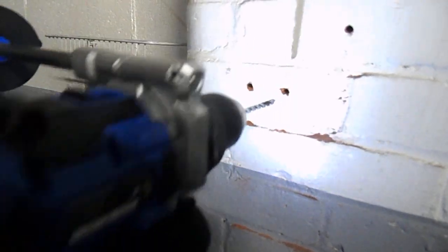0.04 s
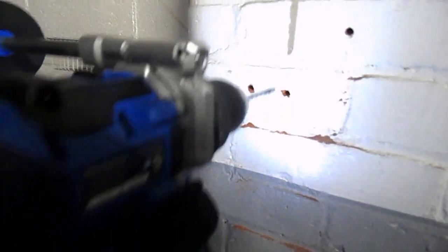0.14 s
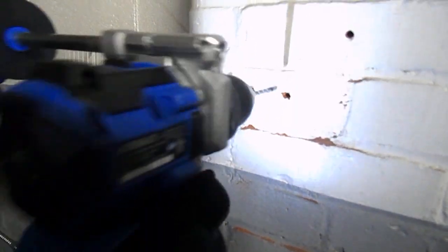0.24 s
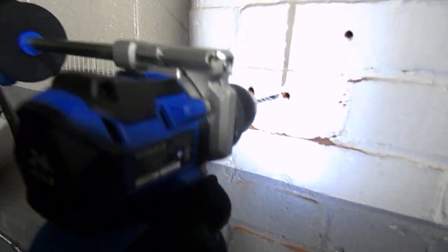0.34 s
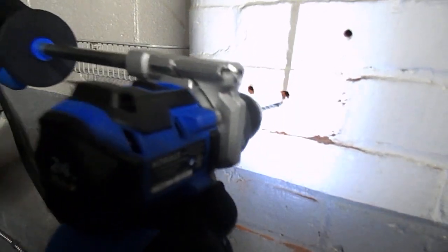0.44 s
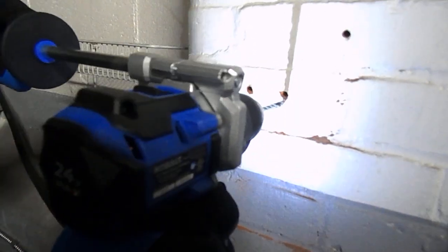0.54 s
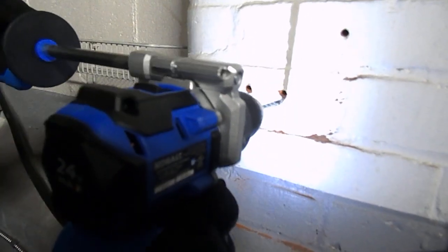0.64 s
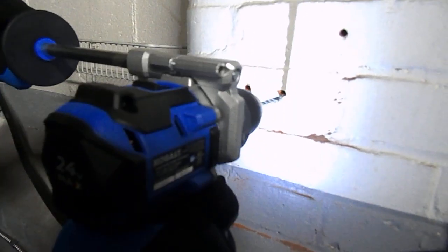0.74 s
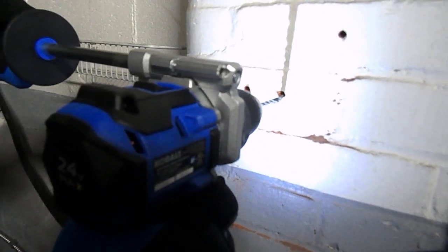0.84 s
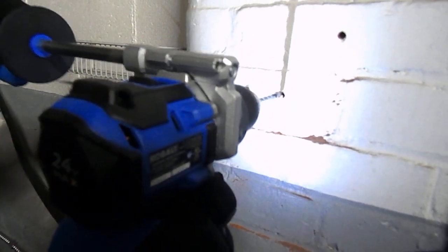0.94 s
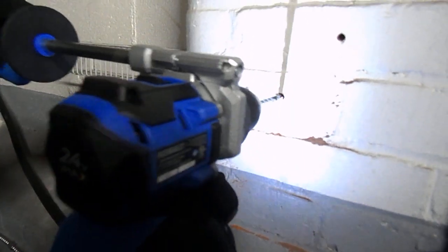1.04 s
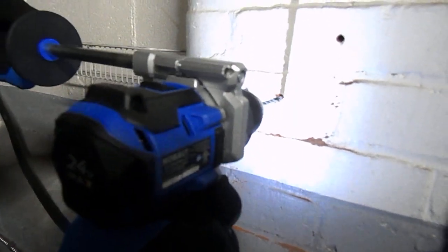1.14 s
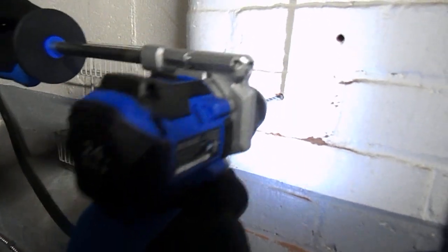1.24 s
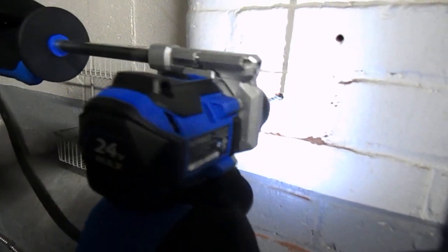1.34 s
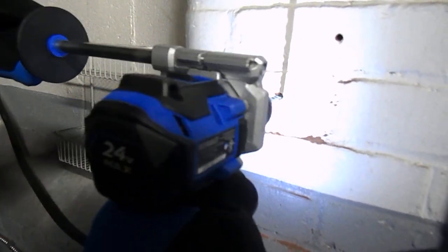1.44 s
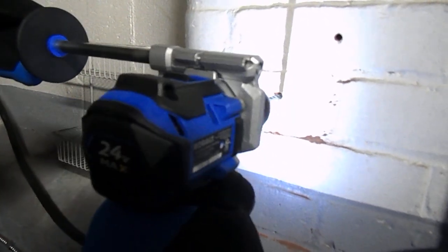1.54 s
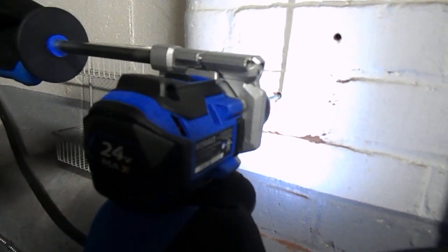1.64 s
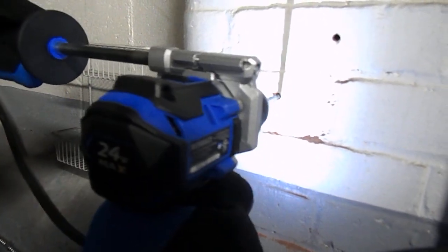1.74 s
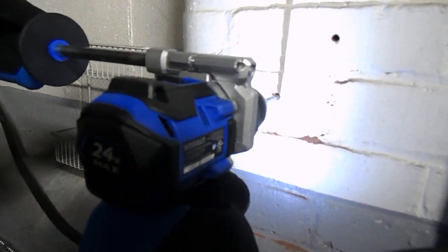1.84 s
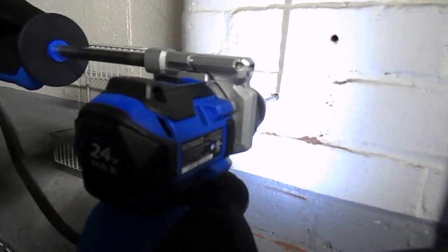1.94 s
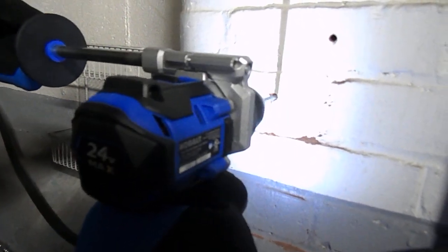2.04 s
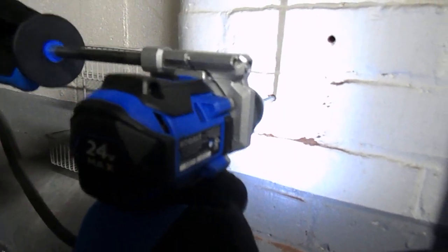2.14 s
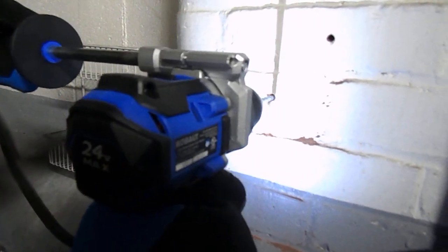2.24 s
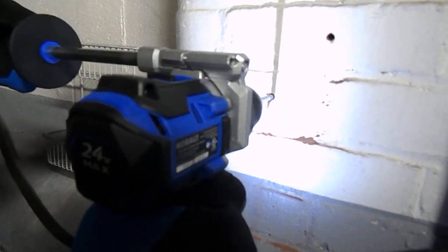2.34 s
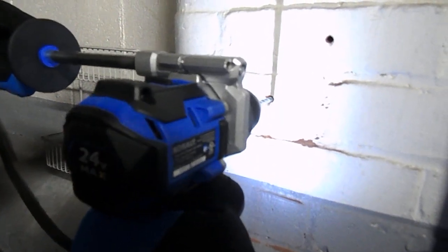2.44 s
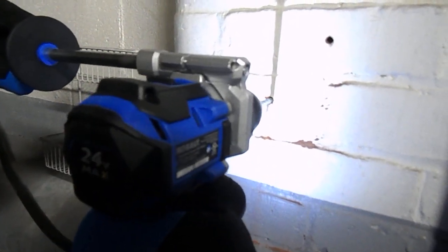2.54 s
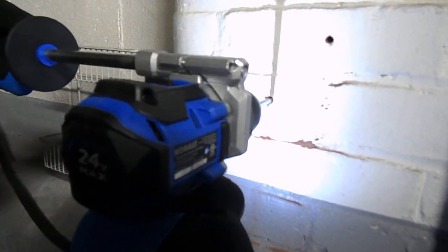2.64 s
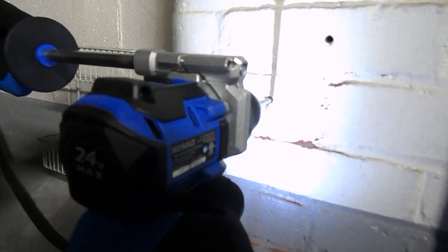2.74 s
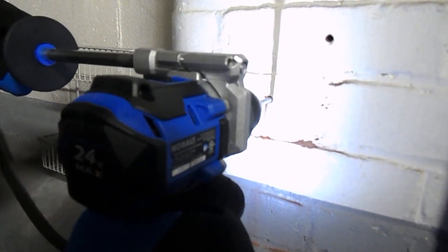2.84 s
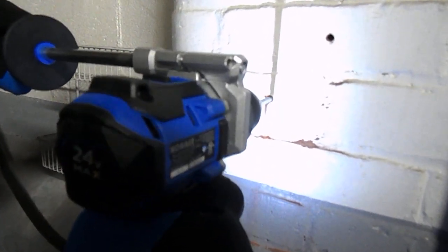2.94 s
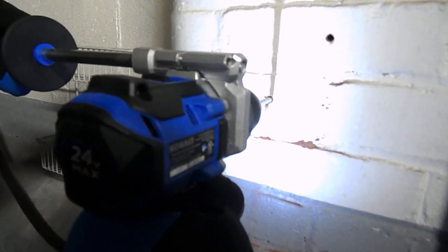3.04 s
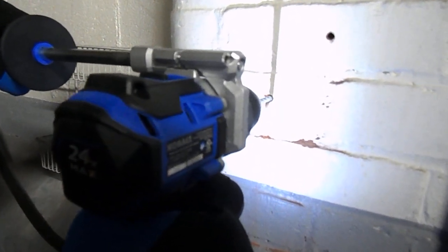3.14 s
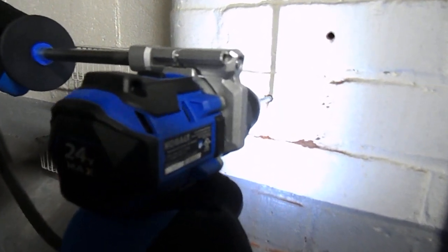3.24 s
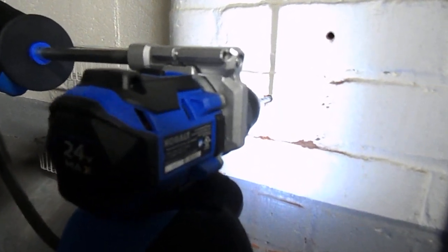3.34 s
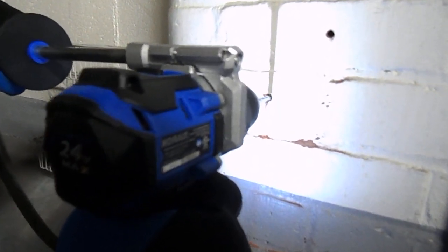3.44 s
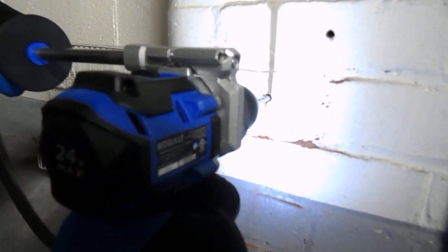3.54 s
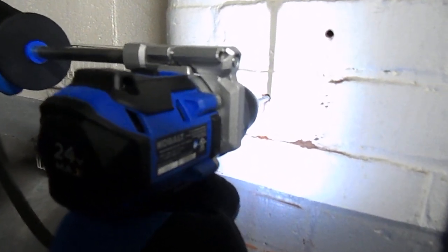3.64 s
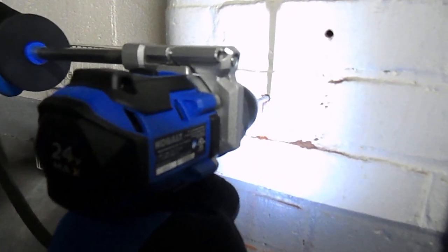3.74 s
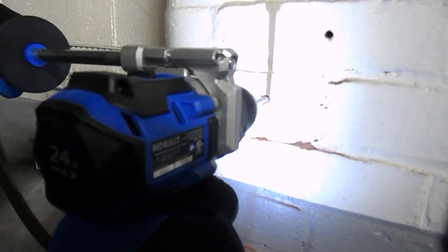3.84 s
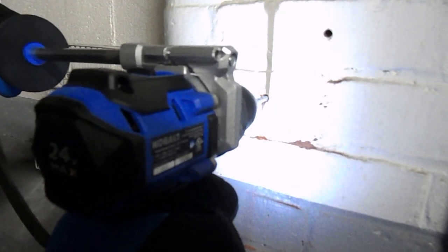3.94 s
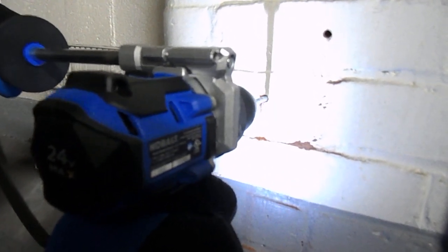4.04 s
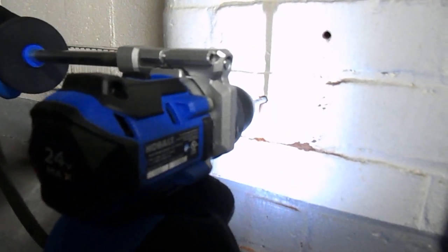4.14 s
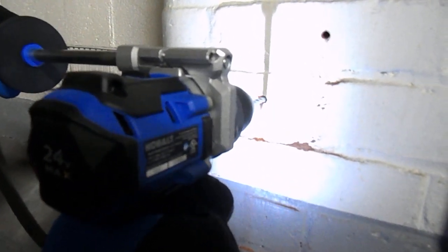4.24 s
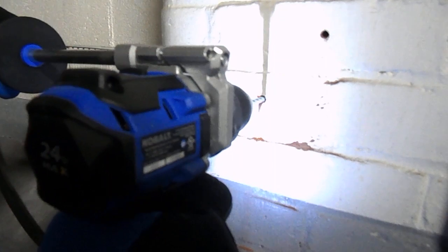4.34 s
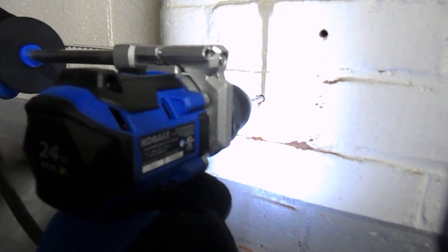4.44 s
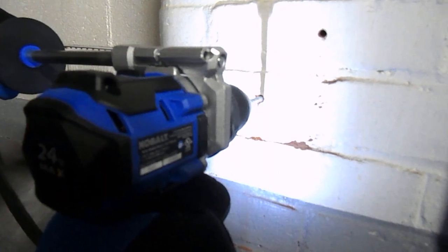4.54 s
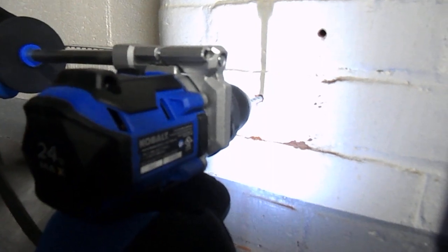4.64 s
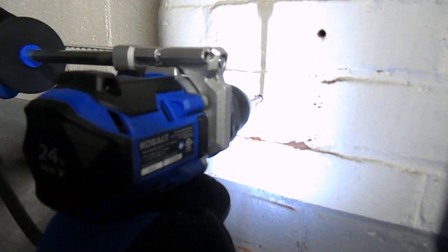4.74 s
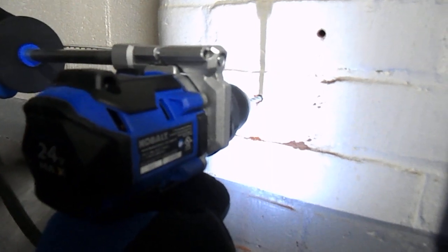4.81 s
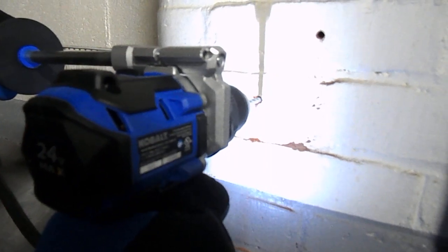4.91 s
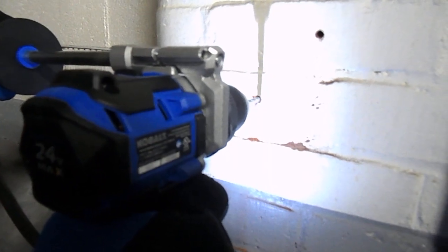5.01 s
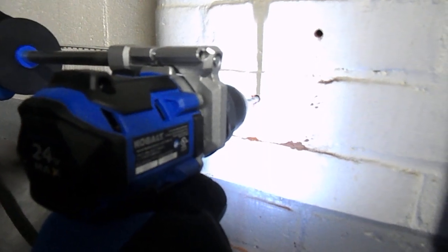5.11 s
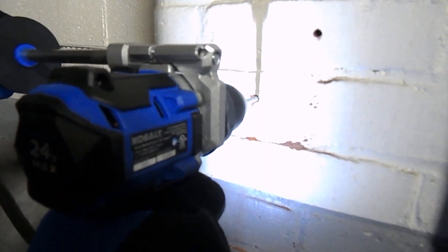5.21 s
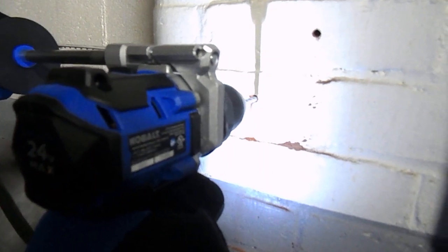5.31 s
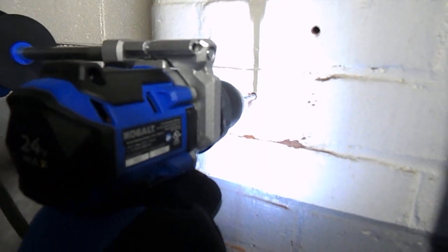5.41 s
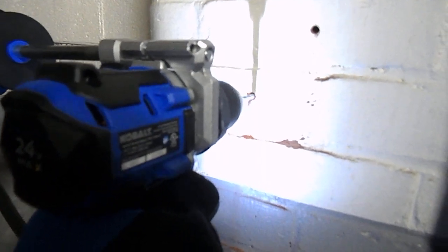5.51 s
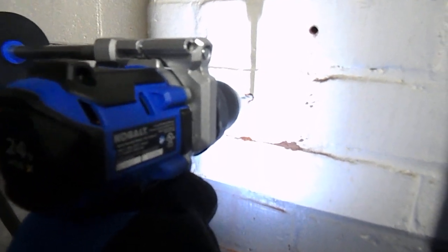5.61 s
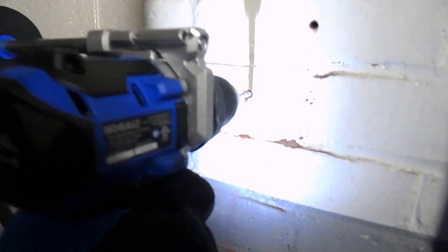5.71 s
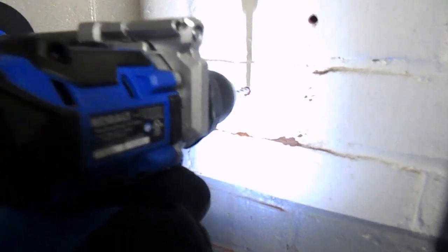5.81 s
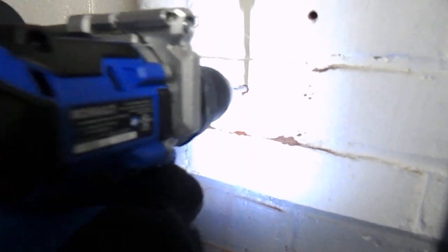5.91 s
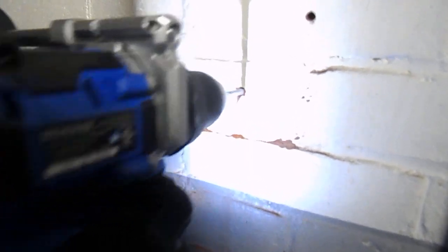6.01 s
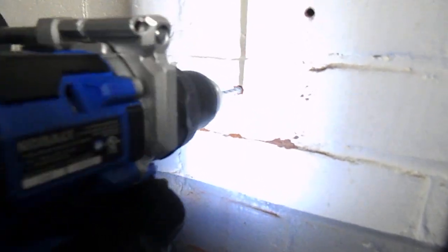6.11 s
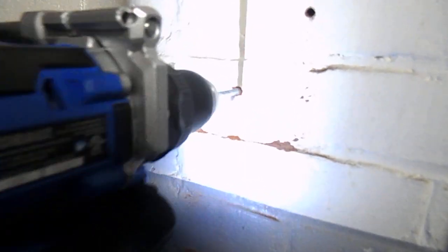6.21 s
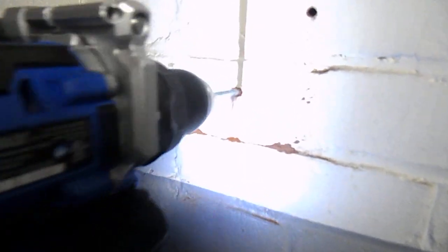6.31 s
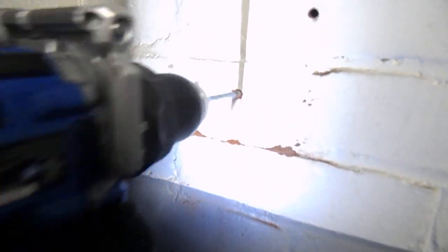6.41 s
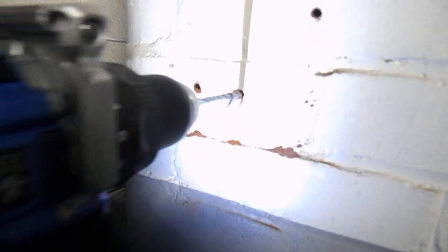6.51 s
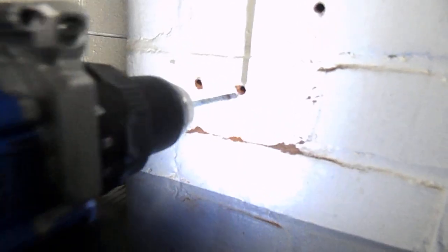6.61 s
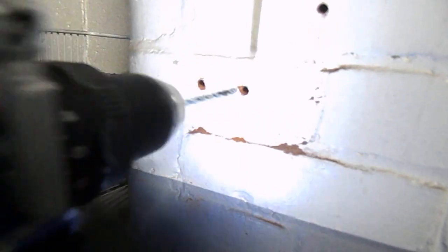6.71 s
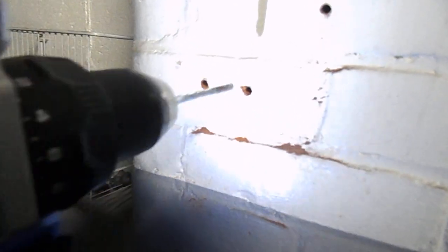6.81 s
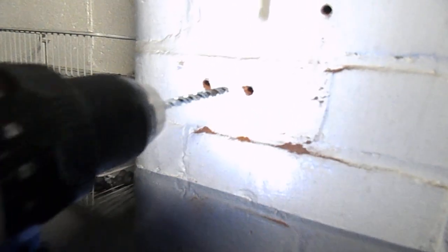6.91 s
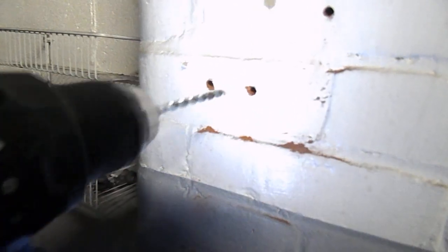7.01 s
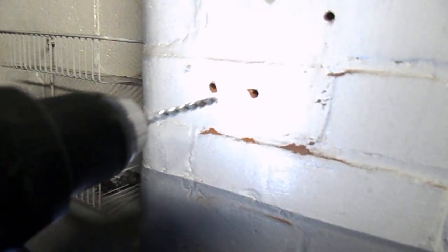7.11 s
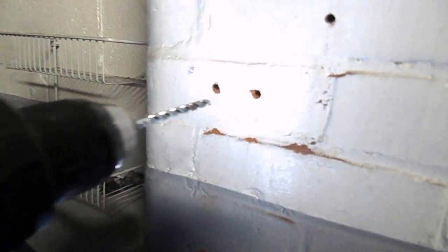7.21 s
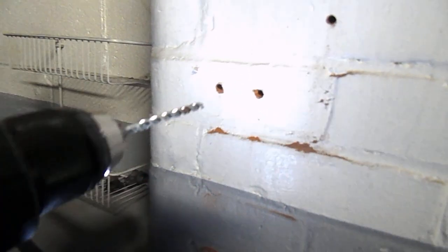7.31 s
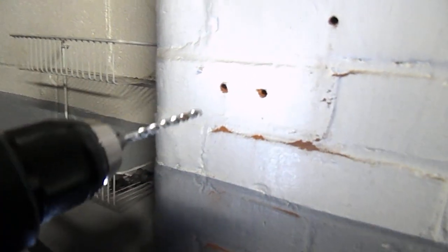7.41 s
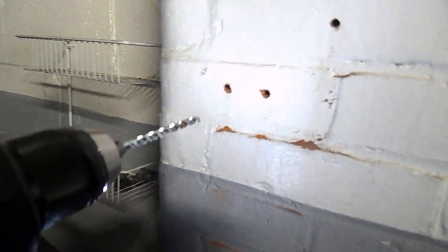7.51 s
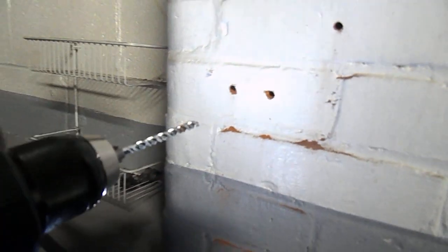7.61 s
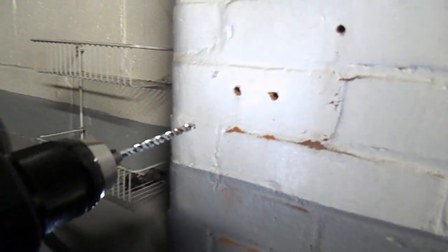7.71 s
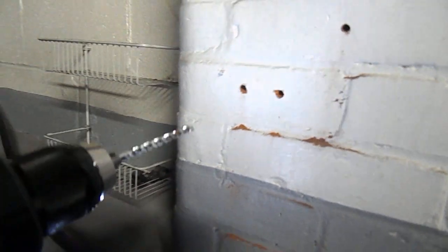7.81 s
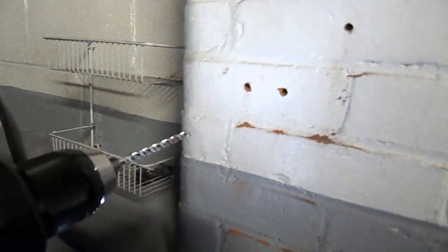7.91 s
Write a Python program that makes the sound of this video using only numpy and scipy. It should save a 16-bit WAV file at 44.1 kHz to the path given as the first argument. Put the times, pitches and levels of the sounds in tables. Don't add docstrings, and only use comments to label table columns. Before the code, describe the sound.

Cordless drill boring masonry up close: a trigger clunk, a long piercing whine over harsh gritty grinding, a second short burst, then abrupt braking into room tone.

```python
import sys
import numpy as np
from scipy import signal
from scipy.fft import rfft, irfft
from scipy.io import wavfile
from scipy.ndimage import uniform_filter1d, map_coordinates

SR = 44100
rng = np.random.default_rng(int(sys.argv[2]) if len(sys.argv) > 2 else 0)


def attenuation_scalar(level_db):
    decades = np.asarray(level_db, float) / 20
    return 10 ** decades


def transcribe(signal):
    frames = np.atleast_2d(signal).T
    limited = np.clip(frames, -1, 1)
    pcm = np.round(limited * 32767).astype(np.int16)
    wavfile.write(sys.argv[1], SR, pcm)


N = 351036
TIME = np.arange(N) / SR
FREQ = np.fft.rfftfreq(N, 1 / SR) + 1e-3
FULL_HZ = 491.7


def curve(rows):
    s, *columns = np.transpose(rows)
    return [np.interp(TIME, s, column) for column in columns]


def over_hz(rows):
    hz, *columns = np.transpose(rows)
    return [np.interp(np.log(FREQ), np.log(hz), column) for column in columns]


def walk(rate):
    k = int(SR / rate)
    held = np.repeat(rng.standard_normal(N // k + 1), k)
    return uniform_filter1d(uniform_filter1d(held, k), k)[:N]


def pan(pan_db):
    return attenuation_scalar(np.array([[.5], [-.5]]) * pan_db)


def tone(turns, db, pan_db):
    return np.sqrt(2) * attenuation_scalar(db) * pan(pan_db) * np.sin(2 * np.pi * turns)


def late_right(pair, lag_s):
    moments = np.arange(N) - lag_s * SR
    return np.array([pair[0], map_coordinates(pair[1], [moments], order=5, mode="nearest")])


def swell(s, rise_db_s, fall_db_s, hold_s=0.):
    return np.minimum(0, rise_db_s * (TIME - s)) - fall_db_s * np.maximum(0, TIME - s - hold_s)


def dying(s, rise_db_s, fall_db_s):
    tail_db = -17 + swell(s, rise_db_s, fall_db_s=121)
    return attenuation_scalar(swell(s, rise_db_s, fall_db_s)) + attenuation_scalar(tail_db)


def impacts(rate, spread_db):
    struck = rng.random(N) < rate / SR
    clicks = struck * rng.standard_normal(N) * attenuation_scalar(spread_db * rng.exponential(size=N))
    return clicks / clicks.std()


# frequency in Hz, density in dB per Hz.
ROOM_BEFORE = [(24, -95), (40, -31), (174, -15), (377, -9), (460, -11.5), (509, -8.5), (686, -7.5),
               (1130, -11.5), (1280, -10), (2570, -16.5), (3470, -16.5), (8300, -24.5), (15500, -37)]
ROOM_AFTER = [(24, -78), (40, -23.5), (179, -10), (406, -6), (1680, -11), (2390, -13.5), (3560, -15),
              (4450, -12.5), (12100, -22.5), (15500, -29)]
# time in seconds, level in dB.
ROOM_LEVEL = [(0, -43.5), (.5, -43.5), (1.0, -42.5), (1.5, -42.5), (6.9, -52), (7.15, -50), (7.4, -47.5),
              (7.96, -48.5)]
# frequency in Hz, level in dB rms.
HUM = [(700, -64), (5895, -72), (11719, -68)]


def room():
    like, = over_hz([(100, 0.73), (700, 0.64), (1500, 0.57), (3500, 0.15), (8000, 0.093)])
    white = rfft(rng.standard_normal((3, N)))
    pair = np.sqrt(like) * white[0] + np.sqrt(1 - like) * white[1:]
    before, after = (irfft(attenuation_scalar(over_hz(rows)[0]) * pair, N) for rows in (ROOM_BEFORE, ROOM_AFTER))
    before, after = before / before.mean(axis=0).std(), after / after.mean(axis=0).std()
    noise = np.where(TIME < 4, before, after)
    lines = sum(tone(hz * TIME, db, 0) for hz, db in HUM)
    return attenuation_scalar(curve(ROOM_LEVEL)[0] + .7 * walk(12)) * noise + lines


def echo(near):
    t60_s, level_db = 0.37, -20
    t = np.arange(int(.4 * SR)) / SR
    tail = rng.standard_normal((2, len(t))) * np.exp(-np.log(1000) * t / t60_s) * (t > .004)
    tail = tail / np.sqrt(np.sum(tail ** 2) / 2)
    return attenuation_scalar(level_db) * signal.fftconvolve(near, tail, axes=1)[:, :N]


def strike(rows, t60_s, noisy, sharpness):
    out, t = np.zeros(N), np.arange(int(.08 * SR)) / SR
    decay = (1 - np.exp(-t / 0.00096)) * np.exp(-np.log(1000) * t / t60_s)
    for s, db, hz in rows:
        i = int(s * SR)
        burst = signal.lfilter(*signal.iirpeak(hz, sharpness, fs=SR), rng.standard_normal(len(t)))
        mode = np.sin(2 * np.pi * hz * t)
        knock = decay * attenuation_scalar(db + 4.0) * ((1 - noisy) * mode + noisy * burst / burst.std())
        out[i:i + len(t)] += knock[:N - i]
    return out


# start in seconds, peak level in dB, frequency in Hz.
CLUNKS = [
    (1.5565, 6.5, 3390),
    (1.5575, -8, 10440),
    (1.587, -15, 900),
    (1.603, -5, 3200),
]
TAPS = [(.438, -34, 700), (.623, -29, 1125), (.809, -28.5, 1150), (1.381, -28, 912), (1.52, -34.5, 4000),
        (7.943, -38, 1130)]
TICKS = [(.767, -43.5, 13000), (.802, -33, 13000), (1.054, -33, 12500), (1.112, -34, 11000),
         (1.521, -33, 12000), (6.928, -13, 8980)]
RUSTLE = [(1.175, -53.5, 11500), (1.205, -50.5, 11800), (1.262, -50, 12300), (1.3, -52, 12000),
          (1.345, -51.5, 12200), (1.37, -51.5, 12300)]
SQUEAKS = [(3.165, -10, 5170), (4.865, -8.5, 5186), (5.752, -9, 5180), (5.86, -6.5, 5600),
           (5.872, -5, 5220)]


def knocks():
    out = strike(CLUNKS, t60_s=.017, noisy=0.083, sharpness=1.2)
    out += strike(TAPS, t60_s=0.025, noisy=.35, sharpness=1.2)
    out += strike(TICKS, t60_s=.013, noisy=.9, sharpness=1.1)
    out += strike(RUSTLE, t60_s=.12, noisy=0.75, sharpness=10.5)
    return out + strike(SQUEAKS, t60_s=0.049, noisy=0.16, sharpness=1.2)


# pressed in seconds, released in seconds, soft start in seconds.
BURSTS = [
    (1.563, 6.118, .077),
    (6.265, 6.787, .004),
]


def shaft():
    loaded_hz, creep_hz_s = 490.8, .22
    drop_hz, coast_hz_s = 40, 400
    brake_s, brake_hz_s, inertia_s = 6.868, 6000, .019
    demand, now = [(0, 0.0006)], 0
    next_pulls = [row[0] for row in BURSTS[1:]] + [brake_s]
    for (pressed, released, soft_s), next_s in zip(BURSTS, next_pulls):
        last_hz = loaded_hz + creep_hz_s * released
        demand += [(pressed, now), (pressed + soft_s, loaded_hz + creep_hz_s * pressed)]
        demand += [(released, last_hz), (released + 1 / SR, last_hz - drop_hz - coast_hz_s / SR)]
        now = last_hz - drop_hz - coast_hz_s * (next_s - released)
    demand += [(brake_s, now), (brake_s + now / brake_hz_s, 0)]
    wander = 1 + .3 / FULL_HZ * walk(3)
    keep = np.exp(-1 / (inertia_s * SR))
    return signal.lfilter([1 - keep], [1, -keep], curve(demand)[0] * wander) + 1e-3


# time in seconds, level in dB, decay in dB per second.
BACKLASH = [
    (.004, -18.5, 500),
    (1.6, -15, 370),
    (6.945, -21.5, 703),
]


def rattle(hz):
    ring_hz, ring_width_hz = 3370, 160
    ring = 1 / (1 + 1j * (FREQ - ring_hz) * 2 / ring_width_hz)
    loose = sum(attenuation_scalar(db) * dying(s, 380, fall_db_s) for s, db, fall_db_s in BACKLASH)
    loose[(TIME > 1) & (TIME < BURSTS[0][0])] = 0
    running = attenuation_scalar(-32) * hz / FULL_HZ
    clicks = (loose + running) * impacts(rate=4000, spread_db=0.5)
    return pan(-1.8) * irfft(rfft(clicks) * ring / np.sqrt(np.mean(abs(ring) ** 2)), N)


def housing_db(hz):
    peak_hz, width_hz = 3390, 307
    return -10 * np.log10(1 + (2 * (hz - peak_hz) / width_hz) ** 2)


# time in seconds, eighth order in dB,
# its left minus right in dB, fan order in dB.
WHINE = [(1.625, -5, 0, -39), (1.652, -14, -5, -39), (1.672, -19.5, -3, -39), (1.73, -15, -3.5, -38),
         (1.9, -10.5, -2.5, -36), (2.4, -12, -4, -31), (3.1, -11, -4, -28), (4.3, -12.5, -7, -29),
         (5.1, -13.5, -11, -24), (5.8, -13, -5, -27), (6.05, -11, -4, -30), (6.3, -12, -1, -28),
         (6.45, -7.5, -4, -23.5), (6.6, -9.5, -1, -25.5), (6.7, -7.5, -1, -27.5), (6.86, -13.5, 3.5, -26.5),
         (6.885, -18, 4, -32), (6.915, -10, 0, -32)]


def whine(hz, turns, decades):
    whine_db, pan_db, _ = curve(WHINE)
    shake = 1 + 0.12 * walk(500)
    whine_db = whine_db + 11.5 + 69.5 * decades + housing_db(hz * 8)
    return shake * tone(8 * turns, whine_db + 0.63 * walk(30), pan_db)


MULTIPLES = [1, 2, 3, 4, 8.18, 10, 11, 12, 16, 20, 23]
# level in dB rms, left minus right in dB, unsteadiness in dB.
ORDER = [(-32.5, 3, 0.1), (-34.5, -0.5, 2.5), (-28.5, -1, 3.5), (-24.5, -4.5, 3.5), (-40.5, 0, 2),
         (-39.5, -16, 3.5), (-41, -3, 4), (-39, -2, -2), (-29, -1.5, 4.5), (-44, -12, 3), (-30, 1, 3.5)]
SWUNG_DB = [0.5, 0, -1, 0, -1, -9, -5, 0, 6, -4, -4]


def motor_orders(hz, turns, decades, swing):
    fan_db = curve(WHINE)[2] + 421 * decades
    out = tone(28 * turns, fan_db - 2 + 3 * walk(12), 2.1)
    for order, (db, pan_db, loose_db), swung_db in zip(MULTIPLES, ORDER, SWUNG_DB):
        order_db = db + swung_db * swing + 70 * decades + loose_db * walk(25)
        out += tone(order * turns + rng.random(), order_db, pan_db)
    surge_db = np.maximum(-1 + 2 * housing_db(hz * 16), -28.5 + 20 * decades)
    out += tone(16 * turns, surge_db, -2) * (TIME < 1.655)
    switch_hz = 10080
    switch_db = -25 + swell(1.59, rise_db_s=2500, fall_db_s=3000, hold_s=.025)
    for sign in (-1, 1):
        out += tone(switch_hz * TIME + sign * 4 * turns, switch_db, 0)
    return out


# time in seconds, push on the bit in dB, openness of hole and vents in dB.
PUSH = [(1.55, -16, 3), (1.7, -18, 1), (1.78, -13, 1), (1.95, -10.5, 0), (2.5, -12, 2), (3.1, -11.5, 0),
        (4.1, -12, 0.5), (5.0, -12, -0.5), (5.75, -12, -1.5), (6.03, -11.5, 1), (6.16, -12, 1),
        (6.2, -13, 1), (6.28, -14.5, 0.5), (6.4, -12, 4.5), (6.65, -11, 1), (6.84, -13, 2),
        (6.872, -13, -1), (6.89, -21.5, 1)]
# level in dB under the push, share of the openness 0-1,
# growth in dB per decade of speed, clatter at a stop in dB.
RANGES = [
    (0, 0, 46, -7),
    (-8.5, 0.21, 20, -19),
    (-11, 0.79, 26, -23.5),
]


def effort(hz):
    push_db, open_db = curve(PUSH)
    decades = np.log10(hz / FULL_HZ)
    lead_s = 0.0089
    clatter = sum(attenuation_scalar(db) * dying(s - lead_s, 80, 446) for s, db, _ in (BACKLASH[0], BACKLASH[-1]))
    gains = []
    for db, share, law_db, stop_db in RANGES:
        running = attenuation_scalar(push_db + db + share * open_db + law_db * decades)
        gains.append(running + attenuation_scalar(stop_db) * clatter)
    return gains


# frequency in Hz, density in dB per Hz, likeness of the two ports 0-1,
# left minus right in dB.
COLOUR = [(165, -55, 0.6, 2), (296, -21, 1, -3), (545, -19.5, 0.9, -6.5), (651, -10, 1, 0.5),
          (980, -4.5, .96, -2.5), (1370, -0.5, 1, 1.5), (1690, -5, 1, 0), (1920, -4.5, 1, -3.5),
          (2360, -13.5, 0.69, -1), (4430, -15.5, 0.03, 0.5), (6400, -17.5, 0, 2.5), (8000, -13, 0.2, 4),
          (10360, -16.5, 0, -1), (15700, -18.5, 0, 5.5)]
# frequency in Hz, width in Hz, lift in dB.
BODY = [(3260, 500, 2.5), (6680, 330, 4.5), (8420, 150, 6), (12000, 2200, 4.5), (1330, 70, 3),
        (1444, 90, 2.5)]


def grind(levels, lag_s, focus):
    colour_db, like, pan_db = over_hz(COLOUR)
    for hz, width_hz, db in BODY:
        colour_db = colour_db + db / (1 + (2 * (FREQ - hz) / width_hz) ** 2)
    colour = attenuation_scalar(colour_db) * pan(pan_db)
    direct = colour * rfft(impacts(rate=9000, spread_db=-0.5))
    scattered = colour * rfft(rng.standard_normal((2, N)))
    low, high = 1 / (1 + (FREQ / 2300) ** 8), 1 / (1 + (7700 / FREQ) ** 12)
    shares = (low, 1 - low - high, high)
    bands_hz = ((600, 1750), (4200, 6710), (8500, 13100))
    same, closer, apart = 0, 0, 0
    for share, (lo, hi), level, trim_db in zip(shares, bands_hz, levels, (.3, 2.2, 2.8)):
        inside = (FREQ > lo) & (FREQ < hi)
        rms = np.sqrt(np.sum(abs(scattered[:, inside]) ** 2)) / N
        gain = level * attenuation_scalar(trim_db + 0.62 * walk(20)) / rms
        same = same + gain * irfft(share * np.sqrt(like) * direct, N)
        closer = closer + gain * irfft(share * (1 - np.sqrt(like)) * direct, N)
        apart = apart + gain * irfft(share * np.sqrt(1 - like) * scattered, N)
    return late_right(same + focus * closer, lag_s) + (1 - .85 * focus) * apart


# time in seconds, lag of the right port in seconds
SWING = [(.3, 6e-5, 6e-5, .2), (.7, 0, 6e-5, .2), (1.5, 0, 6e-5, .2), (1.54, 3.4e-5, 6e-5, .2),
         (4.7, 4.2e-5, 6.8e-5, .22), (5.7, 5.2e-5, 7.7e-5, .27), (6.0, 6.2e-5, 7.9e-5, .35),
         (6.4, 7.3e-5, 9e-5, .75), (6.6, 9.1e-5, 9.3e-5, .9), (6.78, 11.3e-5, 9e-5, .9),
         (6.9, 11.4e-5, 9e-5, .75)]


def scene():
    grind_lag_s, motor_lag_s, focus = curve(SWING)
    hz = shaft()
    turns, decades = np.cumsum(hz) / SR, np.log10(hz / FULL_HZ)
    body = motor_orders(hz, turns, decades, focus) + rattle(hz) + knocks()
    near = late_right(whine(hz, turns, decades), motor_lag_s)
    near = near + late_right(body, np.minimum(grind_lag_s, 7.5e-5))
    near = near + grind(effort(hz), grind_lag_s, focus)
    return near + echo(near) + room()


def low_pass(x):
    return signal.sosfilt(signal.butter(12, 15740, fs=SR, output="sos"), x)


def record(dry):
    loud = np.clip(dry, -1.02, 1.02)
    cut = signal.butter(4, 115, "high", fs=SR, output="sos")
    thin = signal.butter(2, 230, "high", fs=SR, output="sos")
    mix = signal.sosfilt(np.vstack([cut, thin]), loud)
    return low_pass(mix)


dry = scene()
out = record(dry)
transcribe(out)
```